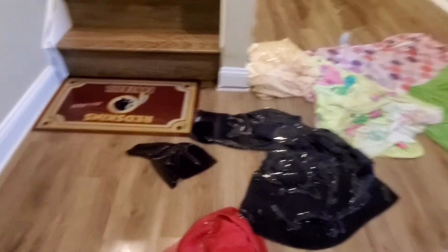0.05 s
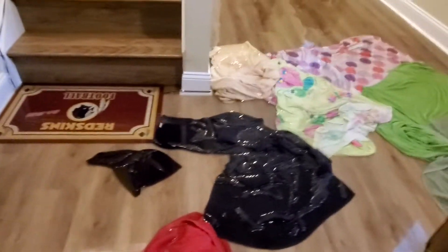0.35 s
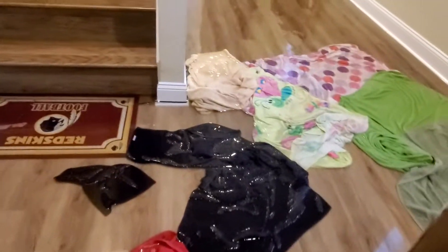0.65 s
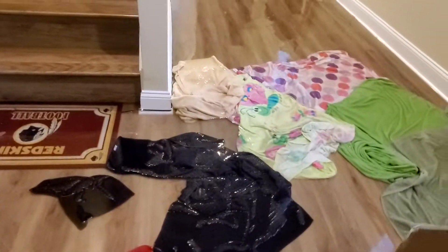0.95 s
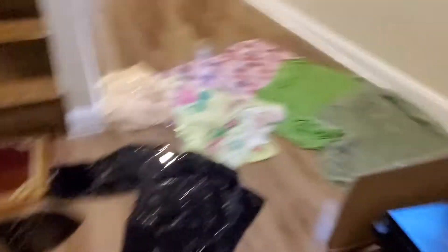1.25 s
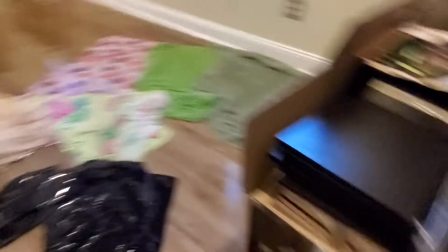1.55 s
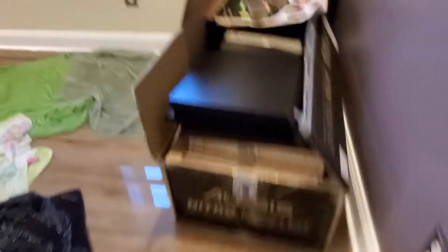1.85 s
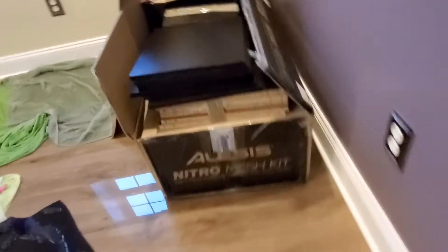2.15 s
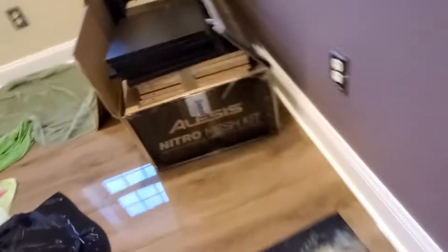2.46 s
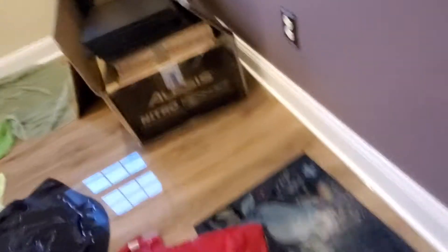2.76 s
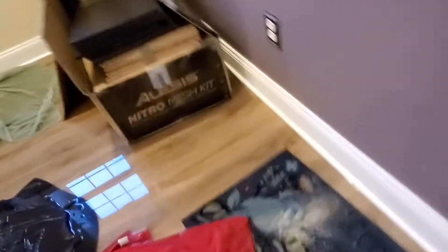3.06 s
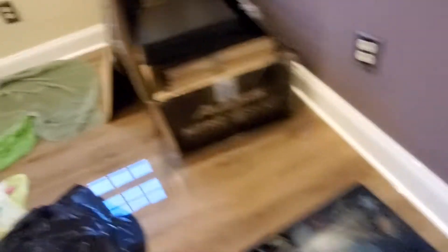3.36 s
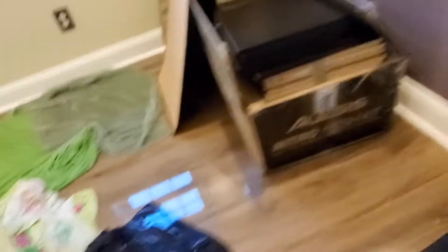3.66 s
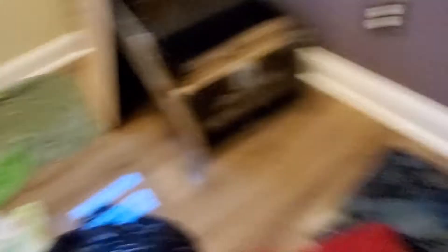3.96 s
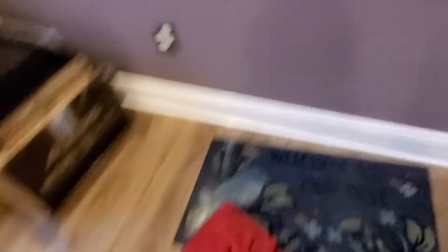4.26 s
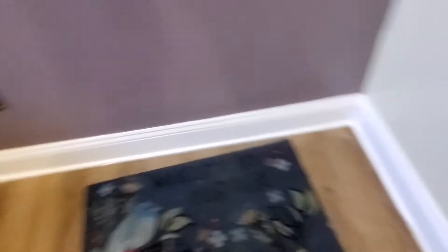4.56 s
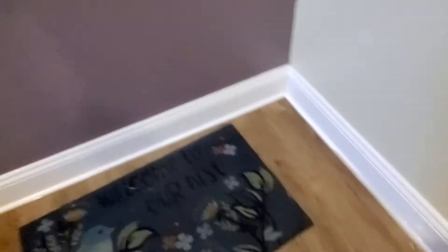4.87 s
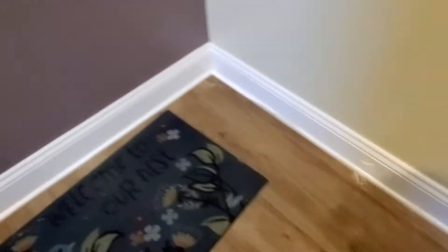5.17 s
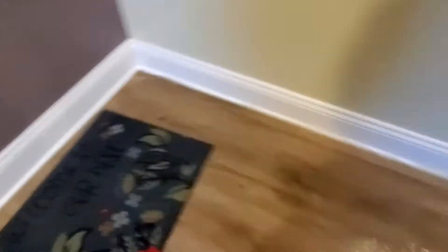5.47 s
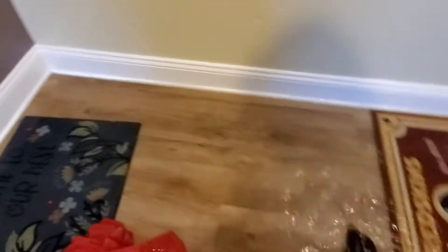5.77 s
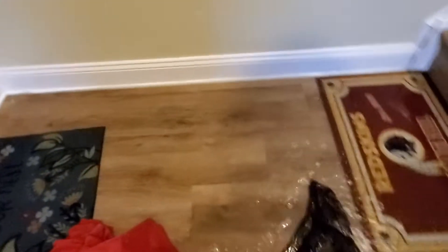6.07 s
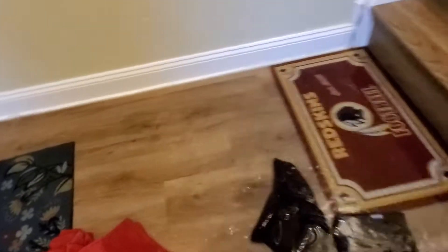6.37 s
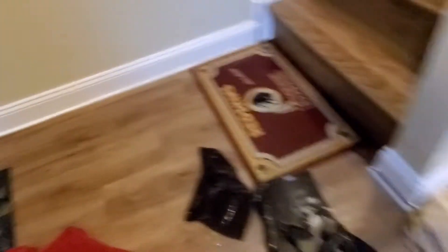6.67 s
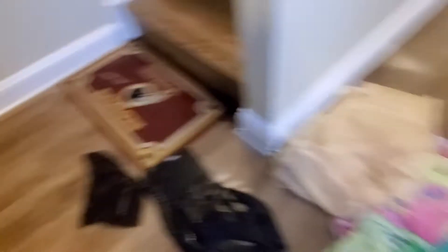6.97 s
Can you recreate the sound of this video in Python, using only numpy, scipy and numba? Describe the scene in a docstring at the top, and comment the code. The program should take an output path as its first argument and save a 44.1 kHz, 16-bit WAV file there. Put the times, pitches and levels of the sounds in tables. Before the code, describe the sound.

Irregular slaps and bubbly surges of water on flooded floorboards ring in a bare hallway, over drips, soft thuds and microphone rumble.

```python
"""Water sloshes across a flooded wooden floor in a bare, echoing hallway.
Each slap (a smack with a trailing wash) and each slower surge traps air as a cloud of ringing
bubbles, from low gulps to fine mist. Big pockets plop, narrow gaps squelch and drops tick.
Low thuds sound over a deep microphone rumble; a faint hum and room air lie beneath."""
import sys
import numpy as np
from scipy import signal
from scipy.fft import rfft, irfft, next_fast_len
from scipy.io import wavfile
from scipy.ndimage import uniform_filter1d
from numba import njit

SR = 44100
rng = np.random.default_rng(int(sys.argv[2]) if len(sys.argv) > 2 else 0)


def log_audio(samples):
    """Write samples as a 16-bit WAV file to the path given in sys.argv[1]."""
    # one column per channel
    frames = np.atleast_2d(samples).T
    # limit to full scale, then quantise
    limited = np.clip(frames, -1, 1)
    pcm = np.round(limited * 32767).astype(np.int16)
    wavfile.write(sys.argv[1], SR, pcm)


N = 313551
TIME = np.arange(N) / SR
CUTOFF_HZ = 16100
LN_1000 = np.log(1000)   # 60 dB of decay

# bubble classes (gulps, glugs, mid, spray, mist): f_low/Hz, f_high/Hz, rate/(1/s), ring/cycles,
# spread/dB, trim/dB
SIZES = [(224, 725, 240, 18.2, 6, -5.5), (605, 1440, 350, 19, 4.5, -4), (1514, 3046, 700, 16.5, 4.5, -1),
         (3246, 8320, 1000, 16.2, 4.5, 2.5), (8500, 14100, 810, 9.9, 6.5, -0.5)]
# slaps on the boards: t/s, t60/s, mid level/dB, gulps/dB, glugs/dB, brightness/dB (these three re mid),
# smack/dB
SLAPS = [(1.1748, 0.26, -40.5, -20, -9, -9, -22.5), (1.5786, 0.09, -22, -5.5, 1.5, -5, -7),
         (1.8648, 0.12, -25.5, -7, 1.5, -11.5, -15.5), (2.4859, 0.22, -28, -10, 2.5, -5, -13.5),
         (2.603, 0.24, -27.5, -4, 0.5, -8.5, -6.5), (3.528, 0.12, -23, -19, -16, -8, -11),
         (3.62, 0.23, -24, -24, -1, -10.5, -11.5), (3.87, 0.092, -47.5, -24.5, -21, 4.5, -38),
         (4.282, 0.022, -49, -6, -18, -2, -31.5), (4.504, 0.19, -18, -15, -5.5, -8.5, -22),
         (4.7636, 0.06, -16, -29, -14, -8, -10), (5.3067, 0.072, -15.5, -17, -11, -7, -13.5),
         (5.4641, 0.38, -30.5, -8.5, 8, -15, -16), (5.853, 0.42, -38, -23, -27, -12, -36),
         (6.179, 0.63, -25.5, -18, -7.5, -3.5, -44), (6.745, 0.32, -34.5, -40, 3.5, -5.5, -30),
         (6.975, 0.26, -34.5, -19, -7, -14, -25), (7.066, 0.14, -25, -50, -7.5, -8, -25),
         (7.106, 0.16, -9, -26, -5, -27.5, -25)]


def from_db(db):
    """Decibels to gain."""
    return 10 ** (np.asarray(db) / 20)


def rms_one(x):
    """Scale to unit power."""
    return x / np.sqrt(np.mean(x ** 2) + 1e-20)


def in_time(points):
    """Read a table at every sample."""
    return np.interp(TIME, *np.transpose(points))


def at_hz(points, hz):
    """Read a table on a log-frequency axis."""
    points = np.array(points)
    return np.interp(np.log(np.maximum(hz, 1)), np.log(points[:, 0]), points[:, 1])


def band(x, low_hz, high_hz, order=2):
    """Butterworth band-pass."""
    return signal.sosfilt(signal.butter(order, [low_hz, high_hz], "band", fs=SR, output="sos"), x)


def swell_and_fade(t_s, swell_s, t60_s):
    """Linear rise from t_s, exponential fall; peak 1."""
    shape, start = np.zeros(N), int(t_s * SR)
    age = TIME[:min(int((swell_s + t60_s) * SR), N - start)]
    fade = np.exp(-LN_1000 * np.maximum(age - swell_s, 0) / t60_s)
    shape[start:start + len(age)] = np.minimum(age / swell_s, 1) * fade
    return shape


def pings(rows, cycles):
    """One damped sine per row of t/s, f/Hz, level/dB."""
    out = np.zeros(N + SR)
    click = signal.unit_impulse(SR // 30) + 1e-18
    for t_s, hz, db in rows:
        start = int(t_s * SR)
        radius, angle = np.exp(-LN_1000 * hz / (cycles * SR)), 2 * np.pi * hz / SR
        ping = signal.lfilter([0, np.sin(angle)], [1, -2 * radius * np.cos(angle), radius ** 2], click)
        out[start:start + len(ping)] += from_db(db) * ping
    return out[:N]


def diffuse_spectrum(size):
    """Frequencies and spectra of white noise, partly alike at the two ears."""
    # left-right likeness: f/Hz, correlation
    likeness = [(25, 0.68), (60, 0.56), (150, 0.82), (350, 0.88), (700, 0.36), (1300, 0), (16000, 0.7)]
    hz = np.fft.rfftfreq(size, 1 / SR)
    mid, side = rfft(rng.standard_normal((2, size)))
    alike = at_hz(likeness, hz)
    return hz, np.sqrt(1 + alike) * mid + np.sqrt(1 - alike) * side * np.array([[1], [-1]])


def noise(colour):
    """Diffuse coloured stereo noise; rms 1."""
    size = next_fast_len(N)
    hz, white = diffuse_spectrum(size)
    return rms_one(irfft(white * from_db(at_hz(colour, hz)), size)[:, :N])


@njit
def add_bubbles(out, born, hz, strength, cycles, rise, lag_s):
    """Each bubble is a dying sine that climbs in pitch and reaches the ears lag_s apart."""
    for k in range(len(born)):
        life = cycles / hz[k] * SR
        for ear in range(2):
            arrival = born[k] + (ear - 0.5) * lag_s[k] * SR
            height, shrink = strength[k], np.exp(-LN_1000 / life)
            for i in range(max(int(arrival) + 1, 0), min(int(arrival + life), out.shape[1])):
                age = (i - arrival) / life
                out[ear, i] += height * np.sin(2 * np.pi * cycles * age * (1 + rise * age / 2))
                height *= shrink


def evened(response, narrow_hz=40, wide_hz=400):
    """Level the chance peaks of a room response so that no note booms."""
    spectrum = rfft(response, 2 * SR)
    power = np.mean(np.abs(spectrum) ** 2, axis=0)
    narrow, wide = (uniform_filter1d(power, 2 * width_hz) for width_hz in (narrow_hz, wide_hz))
    return irfft(spectrum * np.sqrt(wide / narrow))[:, :SR]


def hallway(x, direct_db, late_db, early_db=-6, early_t60_s=0.066, build_s=0.005):
    """Direct sound, reflections from floor and near walls, then the ring of the bare hall."""
    # reverberation time: f/Hz, t60/s
    hall_t60 = [(100, 0.05), (350, 0.55), (1000, 0.49), (2000, 0.83), (6000, 0.77), (15000, 0.36)]
    age = TIME[:SR]
    hz, white = diffuse_spectrum(SR)
    centres_hz = np.geomspace(100, 16000, 9)
    late = 0
    for centre_hz, share in zip(centres_hz, np.eye(len(centres_hz))):
        part = irfft(white * at_hz(np.c_[centres_hz, share], hz), SR)
        t60_s = at_hz(hall_t60, centre_hz)
        late += part * np.exp(-LN_1000 * age / t60_s) / np.sqrt(t60_s)
    late *= np.minimum(age / build_s, 1)
    early = irfft(diffuse_spectrum(SR)[1], SR) * np.exp(-LN_1000 * age / early_t60_s) * (age > 0.001)
    early = band(early, 293, 0.48 * SR, order=1)   # long waves merge with the direct sound
    echoes = (from_db(early_db) * rms_one(early) + from_db(late_db) * rms_one(late)) / np.sqrt(SR)
    response = evened(from_db(direct_db) * signal.unit_impulse(SR) + echoes)
    return signal.fftconvolve(x, response, axes=1)[:, :N]


def room_tone(hum_hz=61.6, air_db=-60.5):
    """A low hum, slightly to the right, and still air."""
    # hum: t/s, level/dB
    hum_level = [(0, -59.5), (3.0, -58), (4.5, -66.5), (5.6, -59.5), (7.11, -78.5)]
    # air spectrum: f/Hz, relative level/dB
    air_colour = [(40, -4), (60, -19), (90, -24), (170, -21), (250, 3.5), (500, 2), (800, -2.5),
                  (1500, -2.5), (2500, -7.5), (4000, -19), (7000, -19.5), (9500, -28), (13000, -20.5),
                  (16000, -22)]
    hum = from_db(in_time(hum_level)) * np.sqrt(2) * np.sin(2 * np.pi * hum_hz * TIME)
    return hum * from_db([[-1.5], [1.5]]) + from_db(air_db) * noise(air_colour)


def low_thuds_and_rumble(gulps, gulp_db=-19.5, rest_db=-69.5, rumble_trim_db=1):
    """Low thuds, which also follow the gulps, over a deep microphone rumble."""
    # rumble spectrum: f/Hz, relative level/dB
    rumble_colour = [(15, -16), (30, -15), (48, -3.5), (70, -8), (110, -55), (300, -73)]
    # rumble envelope: t/s, level/dB
    rumble_level = [(0.0, -64), (2.73, -64), (2.81, -47), (2.91, -68), (3.58, -37.5), (3.8, -58),
                    (3.92, -48), (4.71, -72), (4.91, -53), (4.95, -67), (5.7, -61), (5.76, -82),
                    (6.12, -61), (6.16, -81.5), (6.83, -58), (7.11, -98)]
    # thud spectrum: f/Hz, relative level/dB
    thud_colour = [(50, -39), (90, -2), (120, 3), (175, -6.5), (225, 1.5), (290, -20), (700, -58)]
    # heavy thuds: t/s, swell/s, t60/s, level/dB
    thuds = [(1.098, 0.2, 1.3, -56.5), (2.59, 0.018, 0.45, -42), (2.96, 0.03, 0.73, -35.5),
             (3.35, 0.03, 0.3, -45), (3.49, 0.02, 0.53, -34.5), (4.76, 0.03, 0.24, -47)]
    heavy_power = sum((from_db(db) * swell_and_fade(*timing)) ** 2 for *timing, db in thuds)
    thud_gain = np.sqrt(heavy_power + (from_db(gulp_db) * gulps) ** 2 + from_db(rest_db) ** 2)
    rumble = from_db(in_time(rumble_level) + rumble_trim_db) * noise(rumble_colour)
    return rumble + thud_gain * noise(thud_colour)


def drips(spray, strays_per_s=14, stray_db=-7.5, low_hz=4800, high_hz=15700, trim_db=-1):
    """A drop ticks, shatters into three droplets and its bubbles ring; stray drops follow the spray."""
    # loudest drops: t/s, f/Hz, level/dB
    loud_drops = [(1.97, 4180, -30.5), (2.526, 13550, -29), (2.62, 11600, -20), (2.949, 5600, -19),
                  (3.142, 2970, -25), (3.16, 5850, -19), (3.234, 11800, -34), (3.412, 12100, -25),
                  (3.632, 11840, -38), (3.718, 10100, -26), (3.872, 1730, -35.5), (3.928, 5380, -29),
                  (4.889, 13300, -37.5), (4.946, 1880, -42), (4.988, 13550, -29), (5.094, 13200, -25),
                  (5.526, 7940, -25), (5.805, 14700, -30), (5.818, 1960, -33), (6.08, 10110, -40),
                  (6.971, 8100, -29.5)]
    delay_s, spread_oct, droplet_db = 0.0034, 0.15, -4
    born = np.flatnonzero(rng.random(N) < strays_per_s / SR)
    stray_hz = low_hz * (high_hz / low_hz) ** rng.random(N)[born]
    strays = zip(born / SR, stray_hz, stray_db + 20 * np.log10(spray[born] + 1e-9))
    drops = [*loud_drops, *strays]
    droplets = []
    for (t_s, hz, db), scatter in zip(drops, rng.standard_normal((N // 100, 3, 2))):
        for delay, detune in scatter:
            droplet_hz = min(hz * 2 ** (spread_oct * detune), CUTOFF_HZ)
            droplets.append((t_s + delay_s * abs(delay), droplet_hz, db + droplet_db))
    ticks = pings(drops, cycles=0.5)
    plinks = pings(drops + droplets, cycles=40)
    return from_db(trim_db) * (ticks + plinks)


def squelches(per_s=600, cycles=20.0, rise=0.082, scatter_s=0.00018, trim_db=-1):
    """Water squeezed through a gap sheds like-sized bubbles; their pitch moves as the gap changes."""
    # bubble swarms: t/s, length/s, f_first/Hz, f_last/Hz, spread/oct, level/dB
    swarms = [(1.573, 0.02, 1480, 1580, 0.056, -33.5), (1.862, 0.02, 1240, 1260, 0.076, -35.5),
              (2.069, 0.05, 1690, 1730, 0.11, -37.5), (2.597, 0.05, 2720, 2520, 0.14, -29),
              (2.832, 0.14, 505, 307, 0.13, -44), (2.98, 0.16, 330, 274, 0.27, -38),
              (3.327, 0.23, 401, 337, 0.08, -29), (3.355, 0.12, 1390, 1320, 0.039, -36),
              (3.428, 0.09, 720, 660, 0.029, -32), (4.502, 0.07, 1700, 1820, 0.036, -35),
              (4.672, 0.085, 585, 595, 0.31, -38), (4.765, 0.029, 1800, 1980, 0.031, -30.5),
              (4.89, 0.07, 1080, 2050, 0.18, -47), (5.131, 0.06, 1840, 2460, 0.073, -42),
              (5.524, 0.05, 1970, 1720, 0.14, -31), (5.85, 0.02, 1820, 1800, 0.057, -39),
              (5.911, 0.06, 2440, 2530, 0.059, -36.5), (6.173, 0.07, 2000, 1910, 0.046, -30.5),
              (6.366, 0.075, 410, 1050, 0.068, -46.5), (6.744, 0.04, 1890, 1710, 0.29, -30)]
    out = np.zeros((2, N))
    for t_s, length_s, first_hz, last_hz, spread_oct, db in swarms:
        count = int(per_s * length_s)
        jitter, detune, strength, side = rng.standard_normal((400, 4))[:count].T
        progress = (np.arange(count) + jitter % 1) / count
        born = (progress * length_s * SR).astype(np.int64)
        hz = first_hz * (last_hz / first_hz) ** progress * 2 ** (spread_oct * detune)
        start = int(t_s * SR)
        burst = np.zeros((2, min(SR // 2, N - start)))
        add_bubbles(burst, born, hz, strength * (1 - progress / 2), cycles, rise, scatter_s * side)
        burst = band(burst, min(first_hz, last_hz) * 0.81, max(first_hz, last_hz) * 1.12)
        burst *= np.sqrt(2 * length_s * SR / np.sum(burst ** 2))
        out[:, start:start + burst.shape[1]] += from_db(db + trim_db) * burst
    return out


def plops(onset_s=0.0039, cycles=15.7, warp_rad=0.028):
    """A big air pocket rings as a gliding sine; most climb as they near the surface."""
    # air pockets: t/s, f/Hz, glide/(oct/s), level/dB, hold/s
    pockets = [(1.725, 383.5, 1.5, -27.5, 0.0443), (2.089, 392, 2.5, -43.5, 0.012),
               (2.445, 666, -9, -32, 0.003), (2.604, 391, 0, -23, 0.0088), (2.647, 1090, -4, -21, 0.0031),
               (3.337, 385, 0.5, -22, 0.015), (3.386, 377, -5.5, -22, 0.017),
               (3.456, 685, -1.9, -31.5, 0.035), (3.49, 324, 2.5, -17.5, 0.021),
               (4.618, 232, 9.5, -42, 0.041), (4.663, 405, 15, -25, 0.025), (4.673, 790, -3, -27.5, 0.007),
               (4.694, 666, 9, -26.5, 0.009), (5.464, 807, 6, -26, 0.0095), (5.477, 425, 49, -18, 0.003),
               (6.319, 325.5, 3, -40, 0.034), (7.021, 790, 11, -35, 0.0048)]
    out = np.zeros(N)
    for t_s, hz, oct_per_s, db, hold_s in pockets:
        start, t60_s = int(t_s * SR), cycles / hz
        age = TIME[:min(int((hold_s + t60_s) * SR), N - start)]
        phase = 2 * np.pi * np.cumsum(hz * 2 ** (oct_per_s * age)) / SR
        shape = np.minimum(age / onset_s, 1) * np.exp(-LN_1000 * np.maximum(age - hold_s, 0) / t60_s)
        out[start:start + len(age)] += from_db(db) * shape * np.sin(phase + warp_rad * np.sin(phase))
    return out


def smacks(hz=1850, cycles=3.15):
    """At each slap a sheet of water meets the boards with one short crack."""
    return pings([(t_s, hz, db) for t_s, *_, db in SLAPS], cycles)


def spatter(depth_db=1.7, clump_s=0.006):
    """Wandering gain: spray and mist land in uneven clumps."""
    width = int(clump_s * SR)
    wander = uniform_filter1d(uniform_filter1d(rng.standard_normal(N), width), width)
    return from_db(depth_db * rms_one(wander))


def agitation(spray_share=0.81, hiss_from_s=0.9, hiss_db=-67.5):
    """Envelope per bubble class: slaps and surges add in power, over a faint steady high hiss."""
    # surges along the floor: t/s, swell/s, t60/s, mid level/dB, then re mid: gulps/dB, glugs/dB,
    # brightness/dB
    surges = [(0.005, 0.042, 0.4, -63, -10, 6, -6.5), (0.882, 0.0057, 2.1, -62, 7.5, -10, -6.5),
              (1.07, 0.043, 0.33, -46.5, 8, -5, -8.5), (1.721, 0.0016, 0.57, -39, 6, 3, -9),
              (1.99, 0.014, 0.56, -38, -35, -16, -2.5), (2.068, 0.008, 0.38, -37, -8, -4, -7),
              (2.352, 0.016, 0.58, -31.5, -16, -12, 2.5), (2.639, 0.0039, 0.048, -33, -16, -3, -14),
              (2.764, 0.011, 0.34, -28, -21, -6.5, -15), (2.888, 0.017, 0.2, -26, -8, -7, -10.5),
              (2.933, 0.0067, 0.12, -37, -7, 12.5, 3), (2.974, 0.031, 1.09, -33.5, -4.5, -5.5, -6),
              (3.225, 0.0055, 0.39, -42, -35, -18, 3.5), (3.321, 0.048, 1.06, -26.5, 7, -4, -9.5),
              (3.431, 0.0054, 0.12, -40, 10, 9.5, -15), (3.681, 0.087, 0.53, -47.5, -14, 0, 0),
              (4.031, 0.1, 1.4, -56.5, -24, -31, 2), (4.307, 0.015, 0.76, -33.5, -13.5, -13, -10.5),
              (4.68, 0.026, 1.1, -39.5, -2.5, 4.5, -8.5), (4.851, 0.0071, 0.03, -23.5, -19, 5.5, -26),
              (4.939, 0.0041, 0.078, -24, -43, -26, -10), (4.993, 0.084, 1.6, -44, -11, -21, 2),
              (5.121, 0.03, 1, -39.5, -4, -6, -5.5), (5.229, 0.019, 0.36, -23.5, -21, -8.5, -7.5),
              (5.535, 0.029, 0.25, -35, -24, 5.5, -8), (5.678, 0.0073, 0.11, -36.5, -30, -2, -33),
              (5.782, 0.035, 0.25, -38.5, -19, -24, -10.5), (5.902, 0.013, 0.41, -33.5, -20, -8.5, -11),
              (6.312, 0.023, 0.19, -25.5, -19, -13, -15), (6.49, 0.0038, 0.94, -40, -35, -4.5, -16),
              (6.66, 0.065, 1.1, -37.5, -46.5, -9, -24), (6.85, 0.016, 0.32, -37.5, -30, 2.5, -16)]
    swell_s, crest_lag_s = 0.01, 0.0012   # the splash peaks just after the smack
    puff_swell_s, puff_t60_s, puff_db, puff_bright_db = 0.0047, 0.01, -7.5, 8.5   # mist off the smack
    wash_t60_s, wash_db = 0.64, -15.5   # thrown water falls back
    splashes = list(surges)
    for t_s, t60_s, db, *lows_db, bright_db, _ in SLAPS:
        mist_db = bright_db + puff_bright_db
        puff = (t_s - puff_swell_s, puff_swell_s, puff_t60_s, db + puff_db, *lows_db, mist_db)
        body = (t_s - swell_s, swell_s + crest_lag_s, t60_s, db, *lows_db, bright_db)
        wash = (t_s, swell_s, wash_t60_s, db + wash_db, *lows_db, bright_db)
        splashes += [puff, body, wash]
    power = np.zeros((len(SIZES), N))
    for t_s, swell_s, t60_s, db, gulps_db, glugs_db, bright_db in splashes:
        gains = from_db(db + np.array([gulps_db, glugs_db, 0, spray_share * bright_db, bright_db]))
        alive = slice(int(t_s * SR), int((t_s + swell_s + t60_s) * SR))
        power[:, alive] += np.outer(gains, swell_and_fade(t_s, swell_s, t60_s)[alive]) ** 2
    power[-2:, int(hiss_from_s * SR):] += from_db(hiss_db) ** 2   # top two classes only
    power[-2:] *= spatter() ** 2
    return np.sqrt(power)


def bubble_cloud(low_hz, high_hz, per_s, cycles, spread_db, rise=0.21, scatter_s=0.0002965, even_s=0.016):
    """Random bubbles of one class, many faint and a few loud; rms 1."""
    born = np.flatnonzero(rng.random(N) < per_s / SR)
    strength = from_db(spread_db * np.minimum(rng.exponential(1, N)[born], 4))
    strength *= rng.choice([-1, 1], N)[born]
    hz = low_hz * (high_hz / low_hz) ** rng.random(N)[born]
    # bubble strength by pitch: f/Hz, relative level/dB
    bubble_colour = [(260, -26), (370, 12), (520, 10), (700, -15.5), (1000, -2.5), (1400, 0.5), (1900, 2),
                     (2500, -0.5), (3200, -0.5), (5000, -6), (7300, -2), (9300, 3.5), (12000, 17.5),
                     (16000, 39)]
    strength *= from_db(at_hz(bubble_colour, hz)) * np.sqrt(hz)
    lag_s = scatter_s * rng.standard_normal(N)[born]
    cloud = np.zeros((2, N))
    add_bubbles(cloud, born, hz, strength, float(cycles), rise, lag_s)
    power = np.maximum(uniform_filter1d(np.mean(cloud ** 2, axis=0), int(even_s * SR)), 0)
    cloud /= np.sqrt(power + 0.16 * np.mean(power[born]) + 1e-12)   # live bubbles share the energy
    return rms_one(band(cloud, 0.87 * low_hz, high_hz, order=3))


def sloshing(envelopes):
    """Splashes trap air: five bubble clouds, each under its own envelope."""
    return sum(envelope * from_db(trim_db) * bubble_cloud(*size)
               for envelope, (*size, trim_db) in zip(envelopes, SIZES))


def scene():
    """Sloshing fills the hallway; squelches, plops, smacks and drops are close and drier."""
    # water position: t/s, left minus right/dB
    place = [(0, 2), (1.5, 1), (2.6, 1.1), (3.3, 0.5), (4.2, 1), (4.7, -1.5), (5.3, -1.2), (5.8, -2),
             (6.3, -1), (7.11, -1.5)]
    envelopes = agitation()
    gulps, _, _, spray, _ = envelopes
    spread = hallway(sloshing(envelopes), direct_db=-7.5, late_db=-4.5)
    close = hallway(squelches() + plops() + smacks() + drips(spray), direct_db=-1.5, late_db=-3.5)
    pan = from_db(np.outer([0.5, -0.5], in_time(place)))
    return (spread + close) * pan + low_thuds_and_rumble(gulps) + room_tone()


def record(dry):
    """Steep elliptic low-pass."""
    return signal.sosfilt(signal.ellip(10, 0.1, 80, CUTOFF_HZ, fs=SR, output="sos"), dry)


dry = scene()
out = record(dry)
log_audio(out)
```